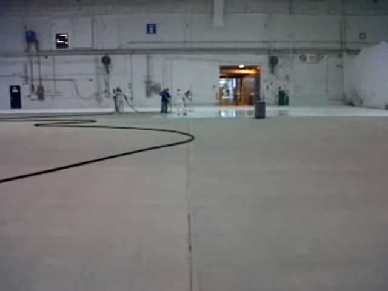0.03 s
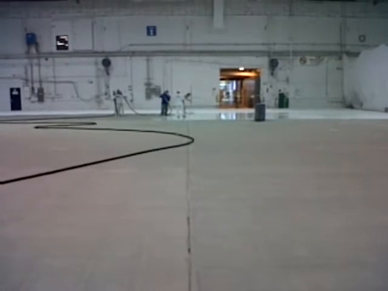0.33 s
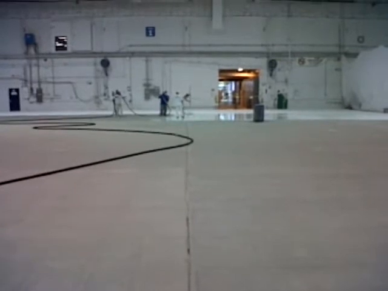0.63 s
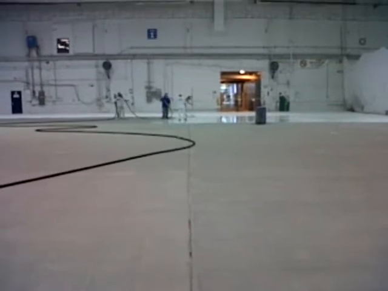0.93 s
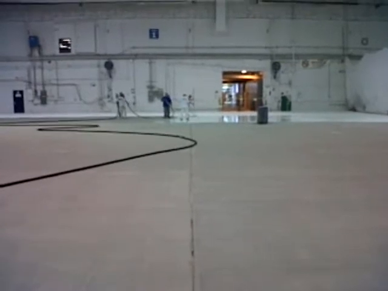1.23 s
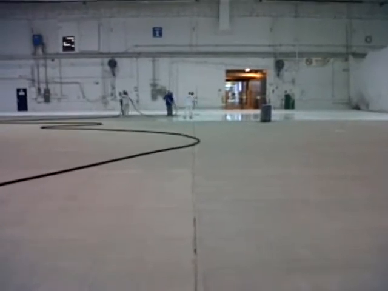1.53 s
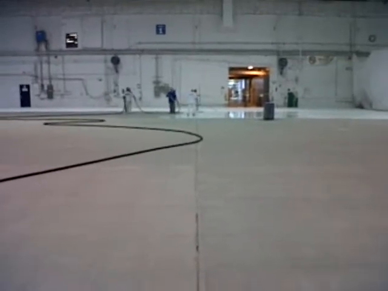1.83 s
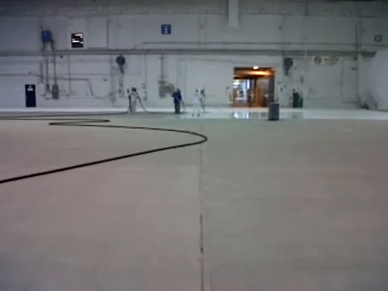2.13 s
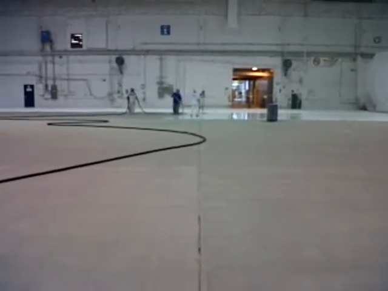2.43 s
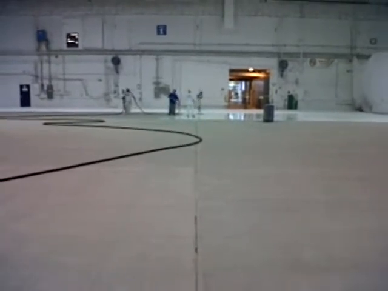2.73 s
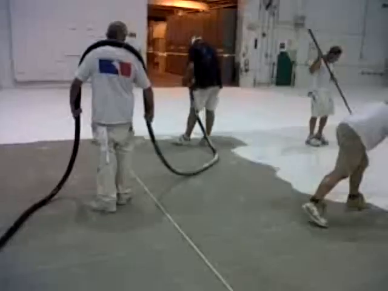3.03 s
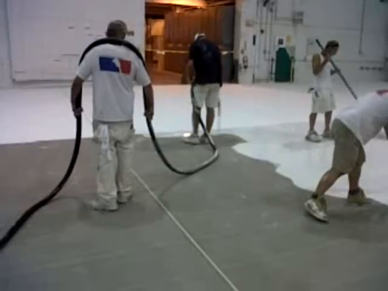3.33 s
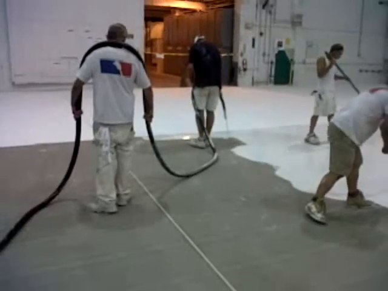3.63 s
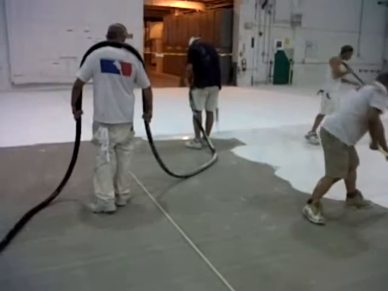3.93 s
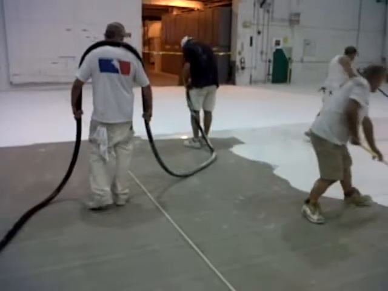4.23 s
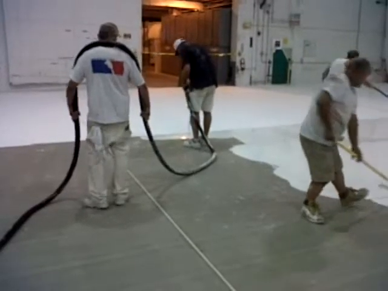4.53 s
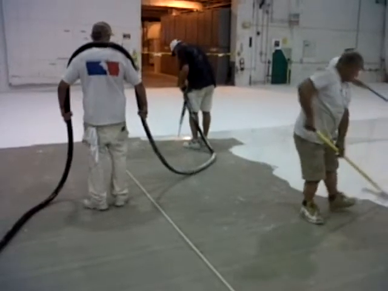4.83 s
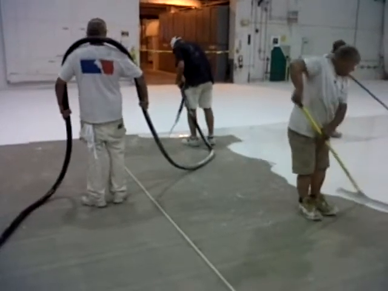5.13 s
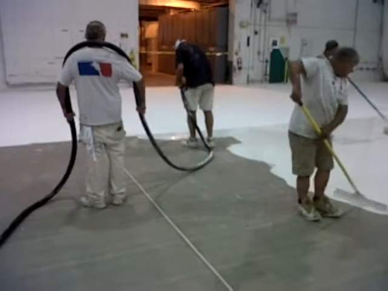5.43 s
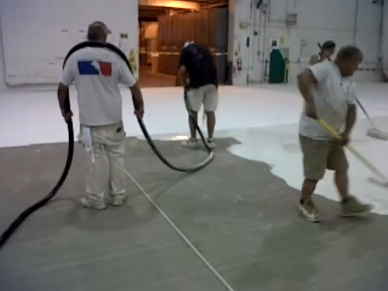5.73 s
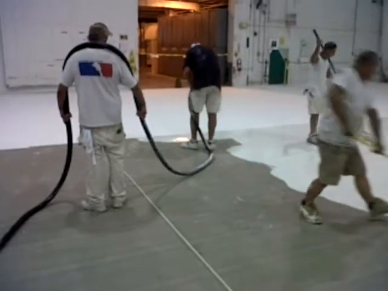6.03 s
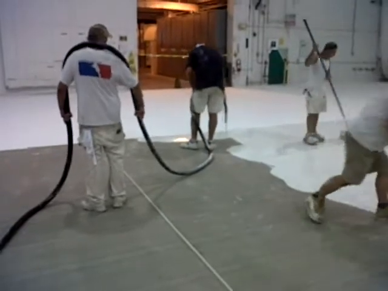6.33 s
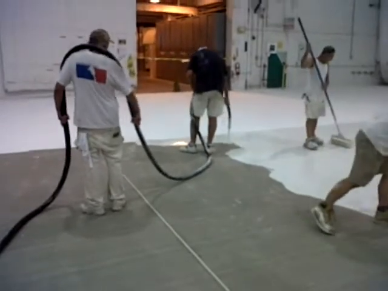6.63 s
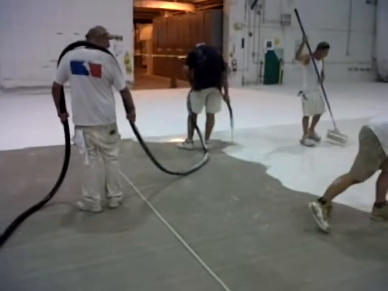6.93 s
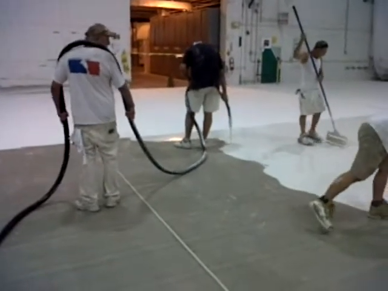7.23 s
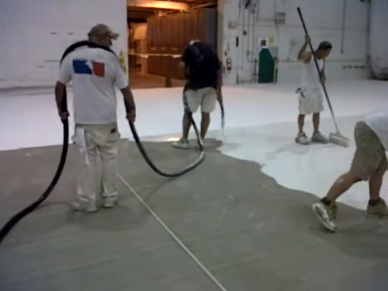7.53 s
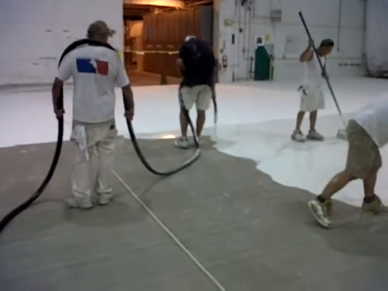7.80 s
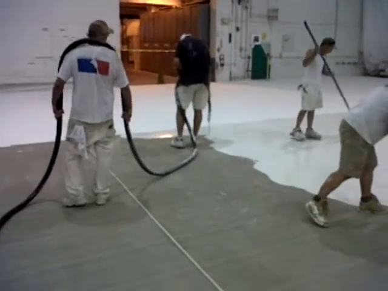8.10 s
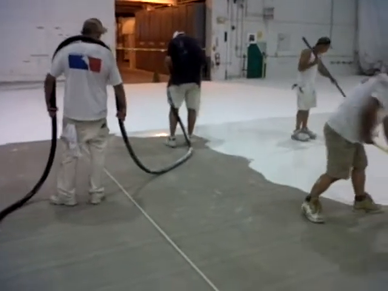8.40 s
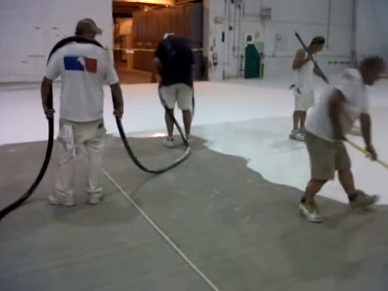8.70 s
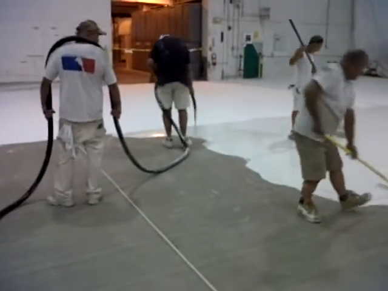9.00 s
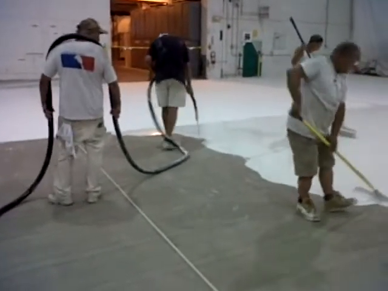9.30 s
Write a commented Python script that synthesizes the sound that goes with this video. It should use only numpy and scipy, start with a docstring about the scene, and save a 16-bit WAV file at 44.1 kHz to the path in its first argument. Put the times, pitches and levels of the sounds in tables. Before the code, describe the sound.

In a big, bare hall, a distant engine roars and a pump hums, with a few soft handling thumps on the microphone. The sound cuts out for a moment and resumes closer. Over the same machines, a hose pours wet mortar in hollow gushes while a nearby rake scrapes gritty strokes, gives short squeals and knocks against the concrete, the walls adding a dull reverberation.

```python
"""A large concrete hall, with a mixer engine and a mortar pump droning. The microphone is first at the
far end, where a hand bumps and rubs its housing, then, after a short silence, beside the crew.
Up close, wet mortar gushes and slops from the hose. A long-handled rake is dragged through it:
the blade grinds on sand, its edge slips and squeals, and knocks on the floor ring the handle.
The bare walls answer the work with a long, dull tail."""
import sys
import numpy as np
from scipy import signal
from scipy.fft import rfft, irfft, next_fast_len
from scipy.io import wavfile

SR = 44100
rng = np.random.default_rng(int(sys.argv[2]) if len(sys.argv) > 2 else 0)


def dump_mix(stems):
    """Bounce the given channels to the path in sys.argv[1] as a 16-bit WAV at rate SR."""
    frames = np.atleast_2d(stems).T  # one column per channel
    limited = np.clip(frames, -1, 1)  # hard clip at full scale
    pcm = np.round(limited * 32767).astype(np.int16)
    wavfile.write(sys.argv[1], SR, pcm)


N = 412776
T = np.arange(N) / SR
PAUSE_FROM_S, PAUSE_TO_S = 2.802, 3.053   # the silence between the two microphone positions


def from_db(db):
    """Decibels to gain."""
    return 10 ** (np.asarray(db) / 20)


def rms_one(x):
    """Scale to rms 1."""
    return x / np.sqrt(np.mean(x ** 2) + 1e-20)


def drift(rate_hz):
    """A smooth random wander with a spread of about 1."""
    step, settle = 40, 2000
    r = np.exp(-2 * np.pi * step * rate_hz / SR)
    noise = rng.standard_normal(N // step + settle + 2)
    slow = signal.lfilter([1], [1, -2 * r, r * r], noise)[settle:]
    return np.interp(np.arange(N) / step, np.arange(len(slow)), rms_one(slow))


def cut(x, hz, kind, order=2):
    """Butterworth high- or low-pass."""
    return signal.sosfilt(signal.butter(order, hz, kind, fs=SR, output="sos"), x)


def colour(x, spectrum):
    """Shape x with a smooth curve of (Hz, dB) points; rms 1."""
    hz, db = np.transpose(spectrum)
    size = next_fast_len(N)
    bins = np.maximum(np.fft.rfftfreq(size, 1 / SR), 1)
    gain = from_db(np.interp(np.log(bins), np.log(hz), db))
    return rms_one(irfft(rfft(x, size) * gain, size)[:N])


def resonate(x, modes):
    """Parallel resonances (Hz, width in Hz, dB) with alternating signs."""
    out = 0
    for k, (hz, width, db) in enumerate(modes):
        r = np.exp(-np.pi * width / SR)
        poles = [1, -2 * r * np.cos(2 * np.pi * hz / SR), r * r]
        ring = signal.lfilter([1, 0, -1], poles, x + 1e-18)
        out += (-1) ** k * from_db(db) * (1 - r * r) / 2 * ring
    return out


def grains(per_s, spread_db, clump_db):
    """Tiny contacts of uneven size that come in clumps."""
    sizes = from_db(spread_db * np.minimum(rng.exponential(1, N), 4)) * rng.choice([-1, 1], N)
    hits = rng.random(N) < per_s / SR
    return sizes * hits * from_db(clump_db * drift(37))


def stroke(start, length):
    """Pressure of one short stroke: it bites fast and lets go slowly."""
    return np.sin(np.pi * np.clip((T - start) / length, 0, 1) ** 0.77)


def swell(start, length, attack_s, release_s):
    """Rise, hold for the rest of the length, then die away."""
    rise = np.clip((T - start) / attack_s, 0, 1)
    return rise * np.exp(-np.maximum(T - start - length, 0) / release_s)


def swells(rows, attack_s, release_s):
    """The summed gain of events (start, length, dB) that share one envelope."""
    return sum(from_db(db) * swell(start, length, attack_s, release_s) for start, length, db in rows)


def beat(period_s, crest_s, share):
    """Complex gain of a tone that beats with a weaker one just below it."""
    return 1 + share * np.exp(-2j * np.pi * (T - crest_s) / period_s)


def ringing(rows, width_hz, attack_s, release_s):
    """Dense small contacts excite one resonance, at its own pitch per event (start, length, dB, Hz)."""
    contacts = [grains(per_s=1500, spread_db=2.0, clump_db=1.5) for _ in range(2)]
    a, b = (rms_one(cut(c, width_hz / 2, "low")) for c in contacts)
    out = np.zeros(N)
    for start, length, db, hz in rows:
        ring = a * np.cos(2 * np.pi * hz * T) + b * np.sin(2 * np.pi * hz * T)
        out += from_db(db) * swell(start, length, attack_s, release_s) * ring
    return out


def hall_tone(phase, scatter, rate_hz):
    """A steady tone plus its many reflections, whose sum wanders in strength and phase; rms 1."""
    in_phase = (1 + scatter * drift(rate_hz)) * np.cos(phase)
    return rms_one(in_phase + scatter * drift(rate_hz) * np.sin(phase))


def hall(x, t60_s=1.8):
    """A long diffuse tail from bare walls, dull on top."""
    t = T[:2 * SR]
    tail = cut(rng.standard_normal(len(t)), 4500, "low") * from_db(-60 * t / t60_s) * (t > .03)
    return signal.fftconvolve(x, tail / np.sqrt(np.sum(tail ** 2)))[:N]


# The mixer's roar from the far end and from beside the crew.
# Each row: frequency in Hz, relative spectral level in dB.
ROAR_FAR = [(30, -8), (60, -7.5), (160, -5), (290, -10.5), (700, -4), (1100, -1.5), (1700, 2),
            (2300, -16.5), (2950, -14), (3600, -17), (3900, -22), (5200, -25.5), (6000, -37.5),
            (7000, -47.5)]
ROAR_NEAR = [(30, -15.5), (80, -10.5), (110, -7.5), (290, -5), (450, -2.5), (620, -12.5), (1020, -3),
             (1380, 1.5), (1830, 1), (2050, -10.5), (3600, -14), (4050, -24), (5200, -34), (7000, -62)]
def roar(near):
    """The churning of the mixer, blurred by the hall, reaches both positions as a smooth wash."""
    far = from_db(-35) * colour(rng.standard_normal(N), ROAR_FAR)
    close = from_db(-36.5) * colour(rng.standard_normal(N), ROAR_NEAR)
    return np.where(near, close, far)


# The motors' upper tones. Each row: frequency in Hz, level in dB at the far end, level in dB up close.
HUM_TONES = [(363.4, -64, -53), (475.5, -62.5, -53.5), (609.6, -57, -55)]
def motor_hum(near, mains_hz=119.7):
    """Mains hum throbs against a slipping motor a little below it, with steady tones above."""
    throb = beat(period_s=.2625, crest_s=np.where(near, 6.076, 1.04), share=.65)
    mains = np.sqrt(2) * np.real(throb * np.exp(2j * np.pi * mains_hz * T))
    out = from_db(np.where(near, -53.5, -59.5)) * mains
    for hz, far_db, near_db in HUM_TONES:
        tone = hall_tone(2 * np.pi * hz * T, scatter=0.087, rate_hz=0.96)
        out += from_db(np.where(near, near_db, far_db)) * tone
    return out


# The engine from the far end and from beside the crew. Each row: harmonic number, level in dB.
ENGINE_FAR = [(1, -68), (3, -54), (4, -53), (6, -47), (7, -47.5), (8, -50), (9, -53), (10, -50.5),
              (11, -45.5), (12, -45.5), (13, -57.5), (14, -48), (15, -57), (16, -53.5), (17, -59.5),
              (18, -52.5)]
ENGINE_NEAR = [(1, -66.5), (2, -55), (3, -54.5), (4, -53.5), (6, -53), (7, -56.5), (8, -50.5), (9, -58),
               (10, -55), (11, -50.5), (12, -54.5), (13, -51.5), (14, -50), (15, -50.5), (16, -51.5),
               (17, -53.5)]
# The fifth harmonic stands out where the microphone passes through a standing wave.
# Each row: start in seconds, length in seconds, level of the added part in dB.
FIFTH_SWELLS = [(-.1, 0.16, -44), (.88, 0.48, -46.5), (2.45, 0.54, -55.5), (4.6, .7, -47), (5.8, 0.57, -47)]
def engine(near, hz=86.42):
    """The mixer's engine turns a little unevenly, and reflections make each harmonic waver."""
    speed_hz = hz * (1 + 0.0009 * drift(1.0) + 0.002 * drift(14.8))
    turn = 2 * np.pi * np.cumsum(speed_hz) / SR
    fifth = from_db(-50) + swells(FIFTH_SWELLS, attack_s=.2, release_s=0.093)
    out = fifth * hall_tone(5 * turn, scatter=0.2, rate_hz=0.77)
    far, close = dict(ENGINE_FAR), dict(ENGINE_NEAR)
    for k in sorted(set(far) | set(close)):
        gain = from_db(np.where(near, close.get(k, -np.inf), far.get(k, -np.inf)))
        out += gain * hall_tone(k * turn + rng.uniform(0, 2 * np.pi), scatter=0.77, rate_hz=2.9)
    return out


def pump(near, far_hz=236.0, near_hz=237.0):
    """The pump's whine and its octave: even from the far end, swelling about once a second up close."""
    phase = 2 * np.pi * np.cumsum(np.where(near, near_hz, far_hz)) / SR
    surge = np.where(near, np.abs(beat(period_s=1.045, crest_s=5.73, share=0.27)), 1)
    whine = surge * hall_tone(phase, scatter=0.1, rate_hz=4.0)
    octave = from_db(-6) * hall_tone(2 * phase, scatter=0.4, rate_hz=6.0)
    return from_db(np.where(near, -41, -48.5)) * (whine + octave)


# Soft bumps right on the microphone's housing at the far end, and one short pop just as the sound returns after
# the silence. Each row: start in seconds, relative level in dB, contact time in seconds.
BUMPS = [(.555, -29, 0.0071), (1.729, -17, 0.0035), (1.7343, -7.5, 0.0017), (1.739, -36, 0.0062),
         (1.755, -21, 0.003), (1.761, -18.5, 0.0057), (1.935, -25.5, 0.0045), (1.980, -24.5, 0.0025),
         (1.997, -25, 0.0047), (3.054, -20.5, .007)]
# A hand shifts on the housing. Each row: start in seconds, length in seconds, level in dB.
RUBS = [(1.5, 0.36, -44.5), (1.92, 0.068, -42.5), (2.55, 0.27, -48.5)]
def handling_noise():
    """A soft contact is one rounded push and the housing springs back; fingers rumble in between."""
    pushes = np.zeros(N)
    for k, (start, db, contact) in enumerate(BUMPS):
        push = np.sin(np.pi * np.clip((T - start) / contact, 0, 1)) ** 2
        pushes += (-1) ** k * from_db(db) * push
    thumps = from_db(2.5) * cut(pushes, 87, "high")
    friction = grains(per_s=400, spread_db=2.0, clump_db=1.5)
    rumble = rms_one(cut(cut(friction, 220, "low"), 40, "high"))
    return thumps + swells(RUBS, attack_s=0.038, release_s=0.11) * rumble


# The hose, close by. Each row: start in seconds, length in seconds, level in dB, pitch in Hz.
GUSHES = [(3.05, 0.21, -39.5, 791), (4.6, 0.46, -40, 537.5), (5.28, 0.12, -38.5, 677),
          (5.85, 0.14, -41.5, 567), (6.7, 0.073, -38.5, 815), (7.46, 0.096, -35.5, 785),
          (8.25, 0.99, -45.5, 572), (9.18, .18, -38, 550)]
def hose():
    """Each gush of the splashing stream rings hollowly, higher or lower with the hose's angle."""
    return ringing(GUSHES, width_hz=120, attack_s=0.043, release_s=0.29)


# How hard the rake works beside the microphone; only the swing about each column's mean is used.
# Each row: time in seconds, pull through the mortar in dB, grind on the sand in dB.
EFFORT = [(3.25, -38, -49.5), (3.45, -38, -50), (3.7, -42, -56.5), (4.3, -41, -50.5), (4.65, -43.5, -50.5),
          (5.0, -41.5, -46), (5.25, -31.5, -47), (5.5, -39.5, -53), (6.0, -37, -56), (6.3, -48.5, -59),
          (6.55, -47, -58.5), (7.05, -42, -59), (7.35, -37.5, -56.5), (7.8, -42.5, -51.5),
          (8.4, -40, -49.5), (8.8, -43, -48), (9.05, -41.5, -47.5), (9.28, -40.1, -45.5)]
def effort():
    """The worker's pull and grind at every sample, in dB about their means after the pause."""
    times, *columns = np.transpose(EFFORT)
    curves = [np.interp(T, times, column) for column in columns]
    return [db - db[T > PAUSE_TO_S].mean() for db in curves]


# Resonances of the wet mortar, up close. Each row: frequency in Hz, width in Hz, relative level in dB.
MORTAR_MODES = [(385, 174, -8), (539, 100, -2.5), (752, 140, -2), (1084, 65, -5.5)]
def slop(pull_db):
    """Mortar slops in a mass of small wet contacts, louder as the rake pulls harder."""
    splats = grains(per_s=1800, spread_db=2.4, clump_db=2.8)
    return from_db(-41 + .8 * pull_db) * rms_one(resonate(splats, MORTAR_MODES))


# Resonances of the dragged rake. Each row: frequency in Hz, width in Hz, relative level in dB.
RAKE_MODES = [(780, 120, -4), (1276, 230, -1), (1398, 188, 0.5), (1717, 130, -3.5), (1889, 84, -5.5),
              (2280, 190, -18), (3440, 240, -24.5)]
def drag(pull_db):
    """The rake rattles in its own modes as it is dragged through the mortar."""
    contacts = grains(per_s=2200, spread_db=2.0, clump_db=3.0)
    rattle = rms_one(cut(resonate(contacts, RAKE_MODES), 1100, "high"))
    return from_db(-38.5 + 0.56 * pull_db) * rattle


# Sand under the blade, up close. Each row: frequency in Hz, relative spectral level in dB.
SAND_SPECTRUM = [(1000, -35), (2000, -3.5), (2700, 5), (3100, 4.5), (3270, -4.5), (3450, 1.5), (3720, 1.5),
                 (4000, -11), (4650, -14.5), (6000, -40)]
def sand(grind_db):
    """Wet sand crunches grain by grain under the blade."""
    crunch = colour(grains(per_s=3500, spread_db=3.0, clump_db=2.5), SAND_SPECTRUM)
    return from_db(-46 + 1.09 * grind_db) * crunch


# Fine droplets and grains, up close. Each row: frequency in Hz, relative spectral level in dB.
SIZZLE_SPECTRUM = [(3000, -21), (4200, 2), (4650, -5), (5150, 1), (5600, -6), (6300, -14.5), (7000, -37.5)]
# Wet spray thrown off the blade. Each row: start in seconds, length in seconds, level in dB.
SPRAYS = [(3.0, .45, -55), (4.8, .5, -56.5)]
def sizzle(grind_db):
    """Droplets and grains sizzle with the grinding and flare up in each spray."""
    droplets = colour(grains(per_s=1700, spread_db=3.2, clump_db=3.0), SIZZLE_SPECTRUM)
    spray = swells(SPRAYS, attack_s=.06, release_s=.12)
    return (from_db(-61.5 + 0.88 * grind_db) + spray) * droplets


# Hard pushes on the rake. Each row: start in seconds, length in seconds, level in dB, pitch in Hz.
PUSHES = [(3.05, 0.14, -35, 1680), (4.82, 0.1, -34, 1767), (5.1, 0.25, -33.5, 1745),
          (5.58, 0.51, -35, 1690), (7.2, 0.13, -34.5, 1700), (9.17, .2, -35.5, 1750)]
def blade():
    """The blade rings while it is pressed hard."""
    return ringing(PUSHES, width_hz=130, attack_s=0.066, release_s=0.15)


# Light pulls make the rake's edge judder. Each row: start in seconds, length in seconds, level in dB.
JUDDERS = [(3.1, 0.18, -41), (3.5, .8, -46), (5.42, 0.64, -42.5), (8.7, 0.94, -43.5)]
# The edge catches and squeaks. Each row: start in seconds, level in dB, length in seconds, pitch in Hz.
SQUEAKS = [(3.517, -38.5, 0.042, 2935), (3.633, -39.5, .15, 2890), (3.812, -40.5, .025, 3000),
           (3.964, -34.5, 0.081, 2875), (4.06, -35.5, 0.054, 2900), (4.146, -40, 0.017, 2860),
           (4.24, -42, .07, 2850), (5.403, -33.5, 0.016, 2910), (5.52, -36.5, 0.047, 2870),
           (5.832, -36, 0.015, 3020), (5.895, -39, 0.043, 2875), (6.756, -36, 0.03, 2850),
           (8.937, -35, 0.037, 2860)]
def squeal(edge_hz=2891, width_hz=39):
    """Uneven slips ring the rake's edge; where they lock to the ringing, a short rough note comes out."""
    slips = grains(per_s=1800, spread_db=-1.0, clump_db=0.5)
    judder = rms_one(resonate(slips, [(edge_hz, width_hz, 0)]))
    out = swells(JUDDERS, attack_s=0.052, release_s=0.22) * judder
    wavering_time = np.cumsum(1 + .006 * drift(12) + 0.01985 * drift(220)) / SR
    flutter = from_db(1.2 * drift(70))
    for start, db, length, hz in SQUEAKS:
        note = np.sqrt(2) * np.sin(2 * np.pi * hz * wavering_time)
        out += from_db(db) * flutter * stroke(start, length) * note
    return out


# Scuffs over bare concrete, close by. Each row: start in seconds, level in dB, length in seconds.
SCUFFS = [(3.067, -28, 0.071), (3.146, -40, 0.22), (4.93, -35.5, .04), (6.669, -27, 0.055),
          (6.746, -29.5, 0.023), (6.765, -26, 0.056), (6.811, -27.5, 0.15), (7.206, -31, 0.089)]
# Their resonances. Each row: frequency in Hz, width in Hz, relative level in dB.
SCUFF_MODES = [(1030, 120, -4), (1370, 89, -2), (1615, 51, 6), (1895, 53, 0.5), (1990, 88, -10),
               (2190, 260, -9), (2930, 310, -11.5), (4930, 1700, -31.5)]
def scuffs():
    """Short strokes that crush sand on the dry floor."""
    pressure = sum(from_db(db) * stroke(start, length) for start, db, length in SCUFFS)
    grit = grains(per_s=6000, spread_db=1.5, clump_db=1.8)
    return pressure * rms_one(resonate(grit, SCUFF_MODES))


# Modes of the rake's handle. Each row: frequency in Hz, relative level in dB, seconds to fall 60 dB.
HANDLE_MODES = [(383, -4.5, 0.038), (534, -19, .03), (636, -13, 0.033), (745, -2, 0.041), (970, -22.5, .02),
                (1286, -1.5, 0.013), (1422, -12, 0.042), (1710, -1.5, 0.044), (1908, -4, 0.032),
                (2180, -11, 0.011), (2577, -14.5, 0.021), (3460, -20.5, 0.0091), (3640, -23.5, .012),
                (5100, -29, .01)]
# The rake hits the floor near the microphone.
# Each row: start in seconds, peak in dB, contact time in seconds, low cut in Hz, high cut in Hz.
KNOCKS = [(3.234, -27.5, 0.0022, 496, 2980), (3.6, -23, 0.0043, 700, 4000),
          (4.952, -18, 0.0035, 1200, 3000), (5.019, -11, 0.0042, 450, 1580),
          (5.031, -14, 0.0031, 650, 1900), (5.09, -19, 0.008, 1210, 6000), (5.174, -20, 0.0022, 910, 3010),
          (5.625, -24, .003, 997, 2500), (5.784, -23.5, 0.0034, 920, 2450), (5.962, -16, 0.0016, 450, 2600),
          (5.974, -22.5, 0.0037, 440, 2020), (6.000, -14.5, 0.0047, 706, 2000),
          (6.038, -26.5, 0.0027, 597, 2170), (6.8244, -9, 0.0026, 1390, 4500),
          (7.152, -4, 0.0045, 198, 5580), (7.216, -24, .004, 1280, 4000), (7.769, -27.5, 0.005, 500, 2490),
          (7.92, -32, 0.0034, 700, 3020)]
def knocks():
    """The handle's modes build up while the blade chatters on the floor, then die in the worker's grip."""
    out, t = np.zeros(N + SR), T[:SR // 8]
    hz, mode_db, t60 = np.transpose(HANDLE_MODES)[:, :, None]
    for start, peak_db, contact, low_hz, high_hz in KNOCKS:
        rise = np.minimum(t / contact, 1) ** 0.66
        decay = from_db(-60 * np.maximum(t - contact, 0) / t60)
        strength = from_db(mode_db + rng.standard_normal(hz.shape))
        modes = strength * rise * decay * np.sin(2 * np.pi * (hz * t + rng.random(hz.shape)))
        crack = cut(rng.standard_normal(len(t)), 2600, "low") * from_db(-4.5 - 60 * t / 0.016)
        blow = modes.sum(axis=0) + crack
        ring = cut(cut(blow, low_hz, "high"), high_hz, "low")   # wet mortar cushions some blows
        at = round(start * SR)
        out[at:at + len(t)] += from_db(peak_db) * ring / np.abs(ring).max()
    return out[:N]


def scene():
    """The machines from the far end, then from beside the crew, where the hose and rake join them."""
    near = T > PAUSE_FROM_S
    pull_db, grind_db = effort()
    spreading = slop(pull_db) + drag(pull_db) + sand(grind_db) + sizzle(grind_db)
    rake = spreading + blade() + squeal() + scuffs() + knocks()
    crew = near * (rake + hose())
    machines = engine(near) + pump(near) + motor_hum(near) + roar(near)
    return (machines + crew + from_db(-21) * hall(crew) + handling_noise())[None]


def record(dry):
    """One small microphone with little deep bass and a steeply falling top; silent between positions."""
    running = (T < PAUSE_FROM_S) | (T > PAUSE_TO_S)
    voiced = cut(running * cut(dry, 25, "high"), 5780, "low", order=6)
    treble_limit = signal.ellip(10, .3, 80, 6800, fs=SR, output="sos")
    return signal.sosfilt(treble_limit, voiced)


dry = scene()
out = record(dry)
dump_mix(out)
```